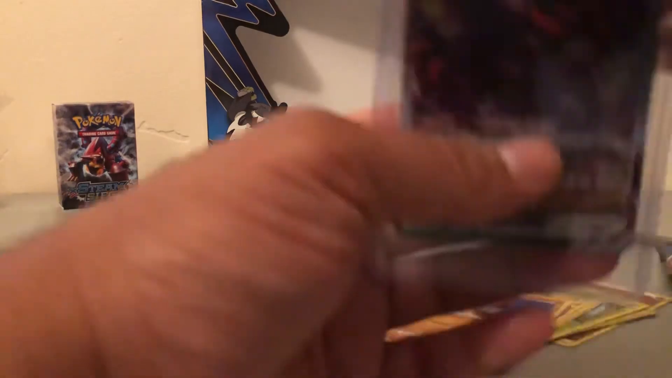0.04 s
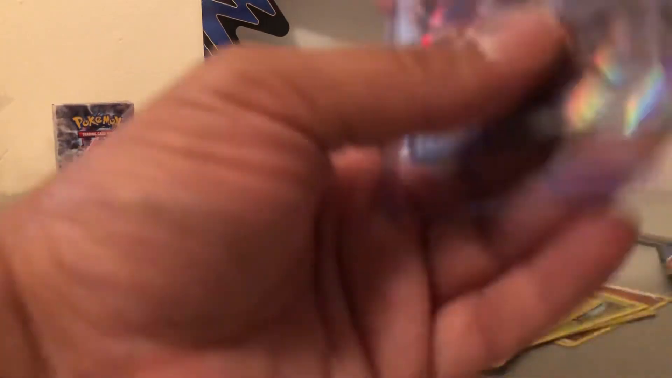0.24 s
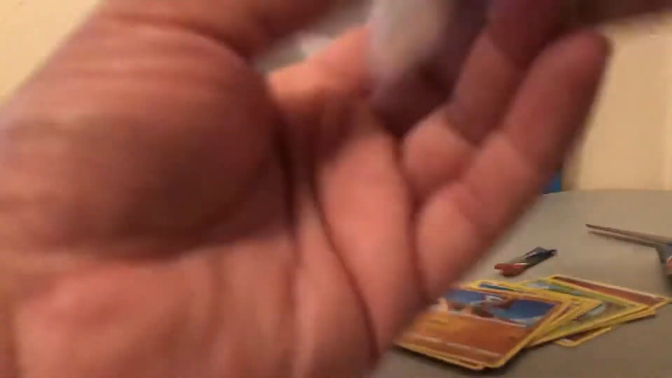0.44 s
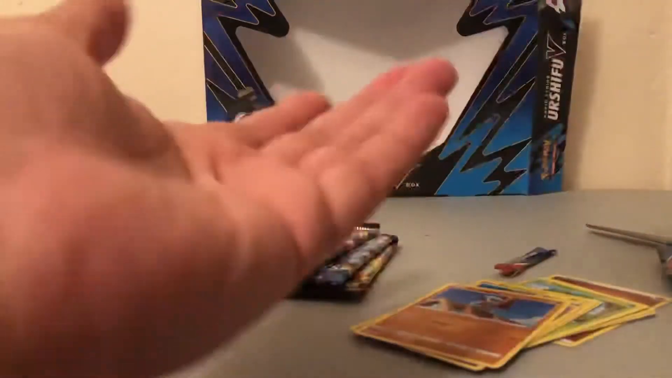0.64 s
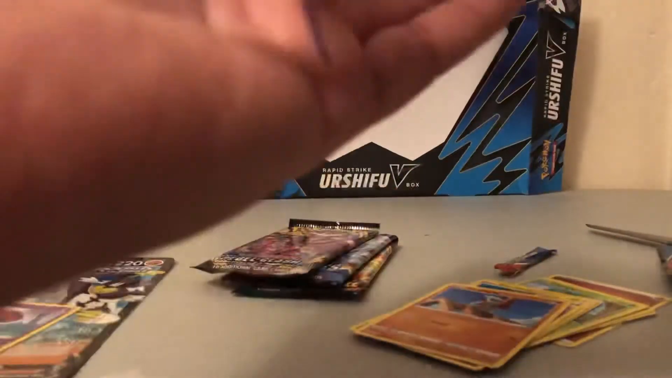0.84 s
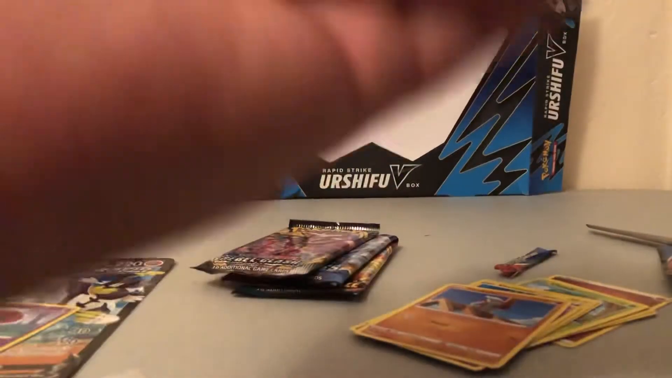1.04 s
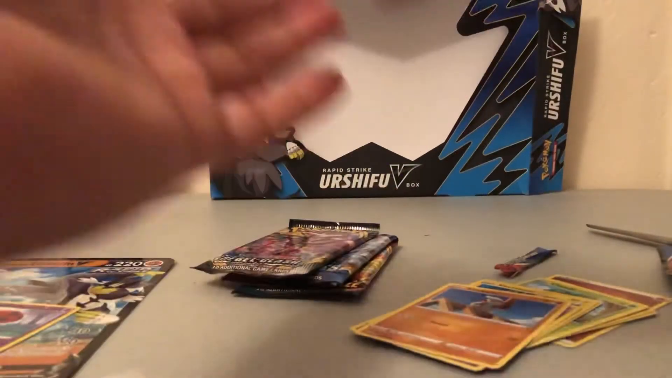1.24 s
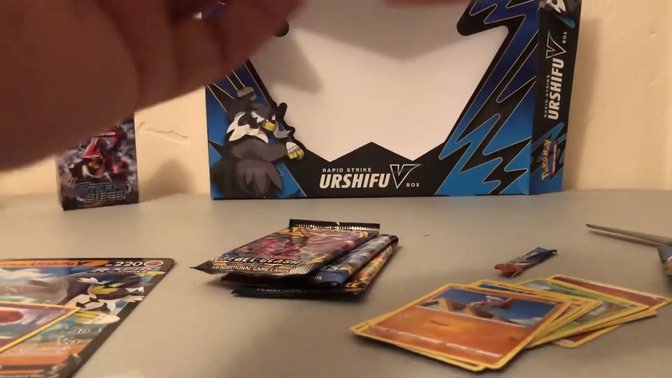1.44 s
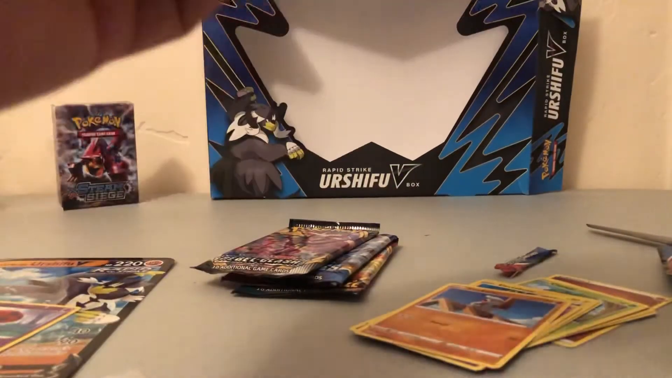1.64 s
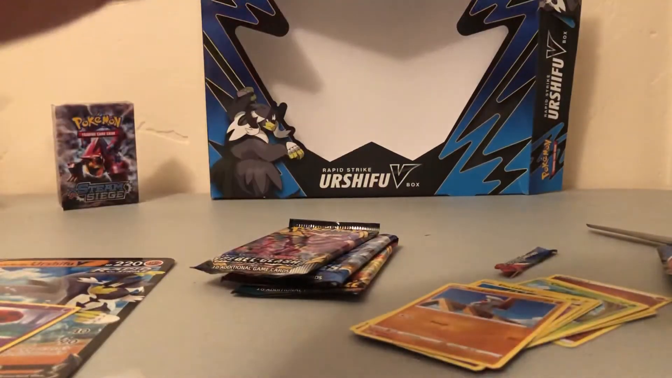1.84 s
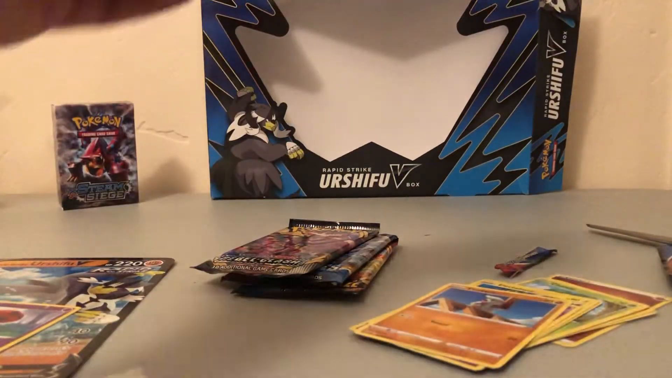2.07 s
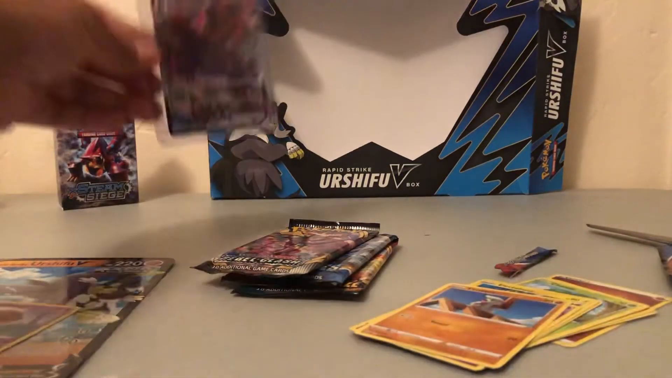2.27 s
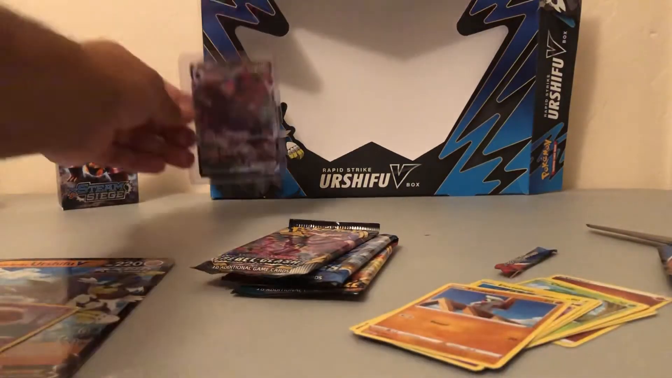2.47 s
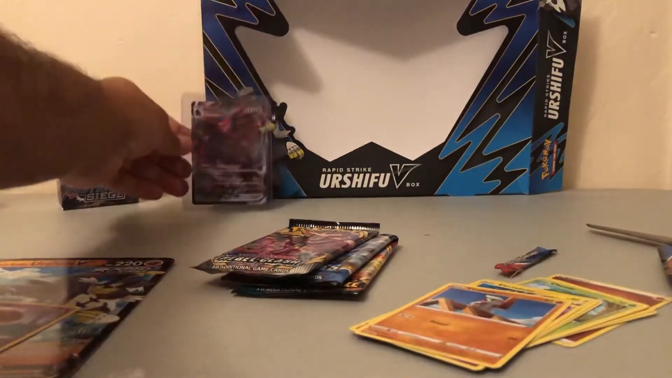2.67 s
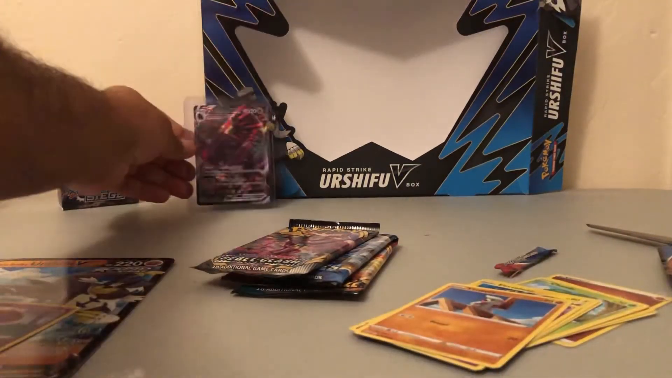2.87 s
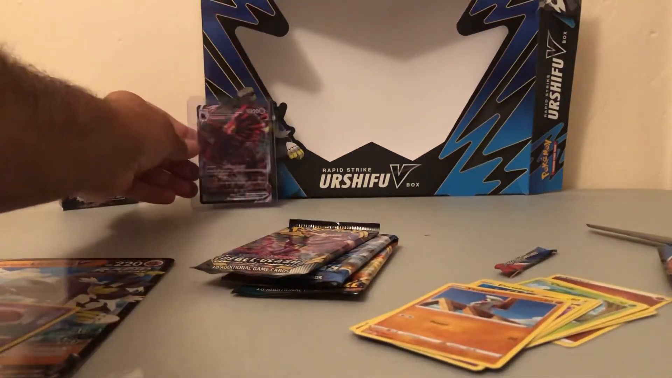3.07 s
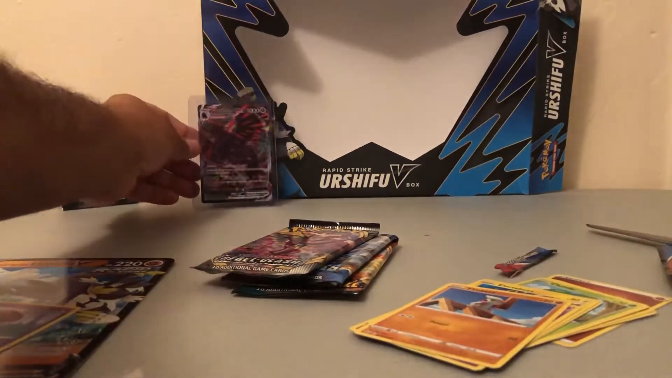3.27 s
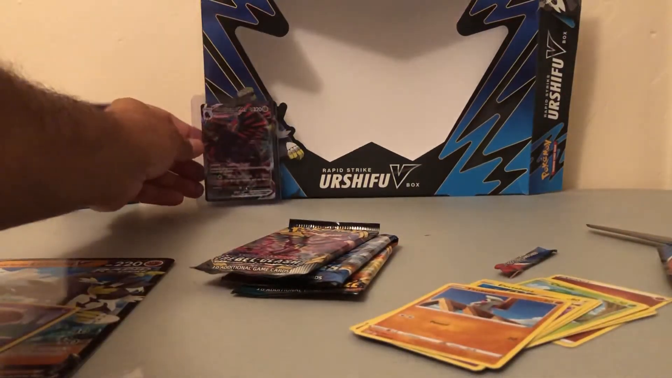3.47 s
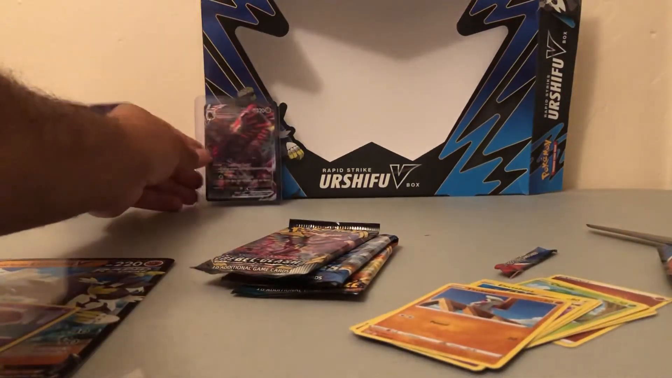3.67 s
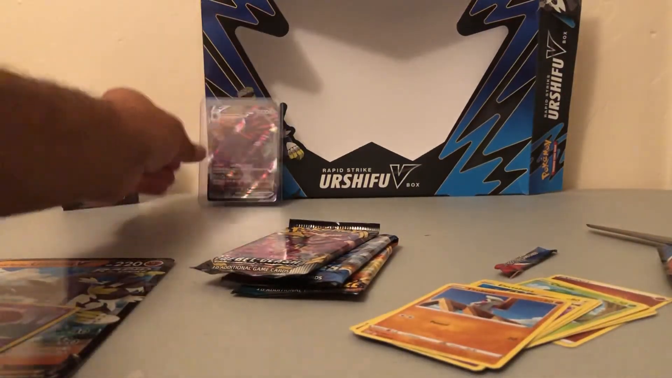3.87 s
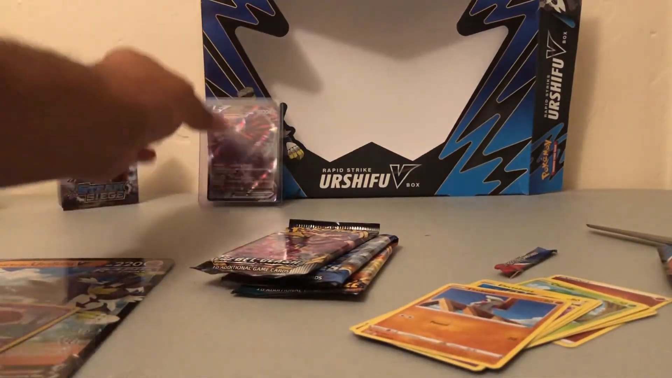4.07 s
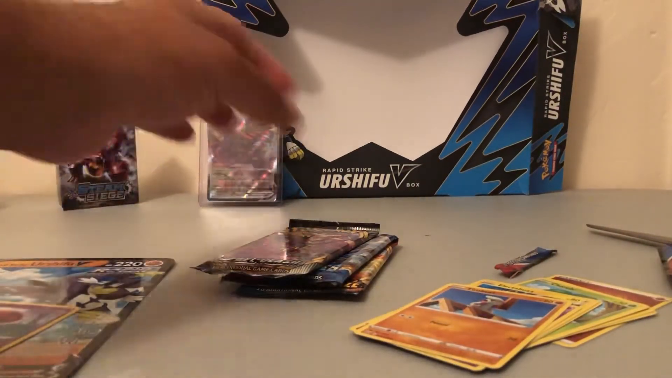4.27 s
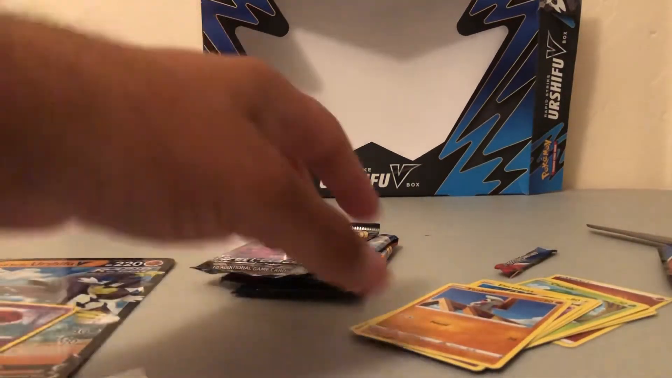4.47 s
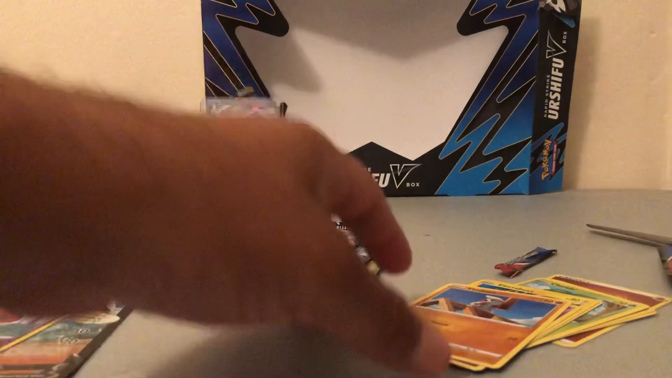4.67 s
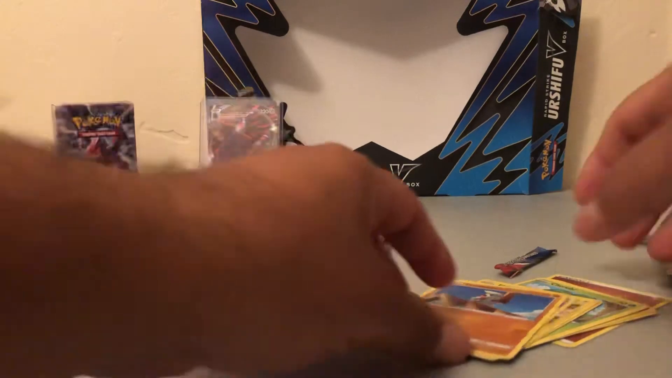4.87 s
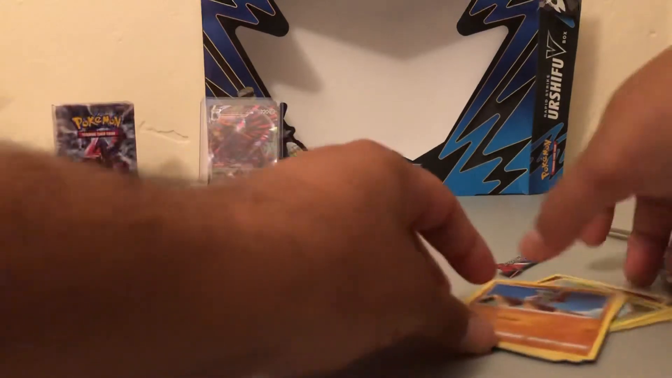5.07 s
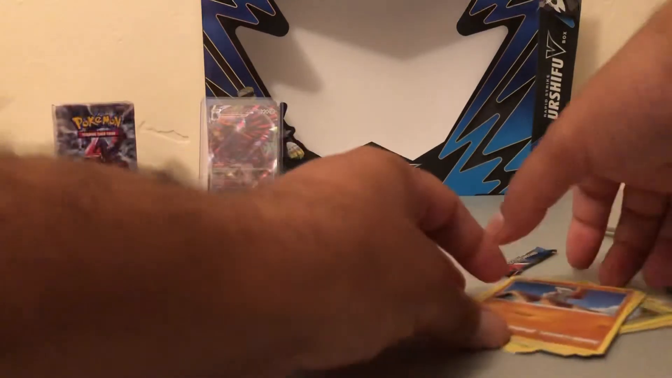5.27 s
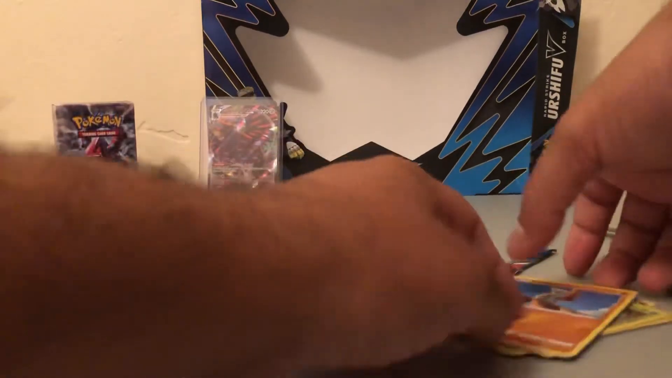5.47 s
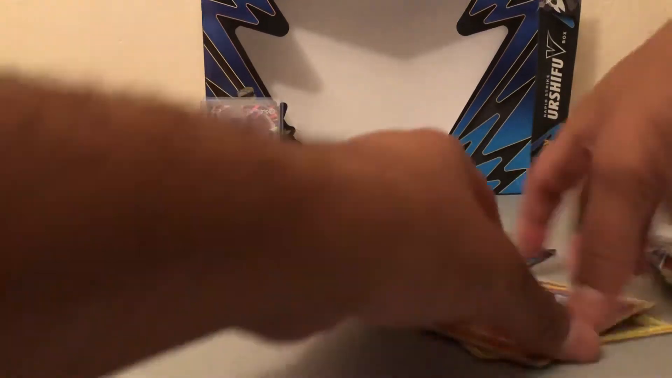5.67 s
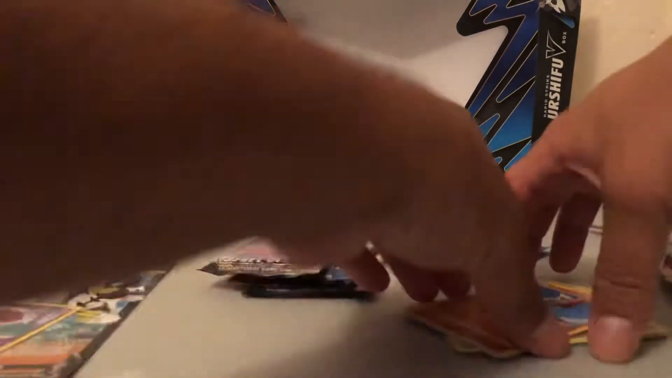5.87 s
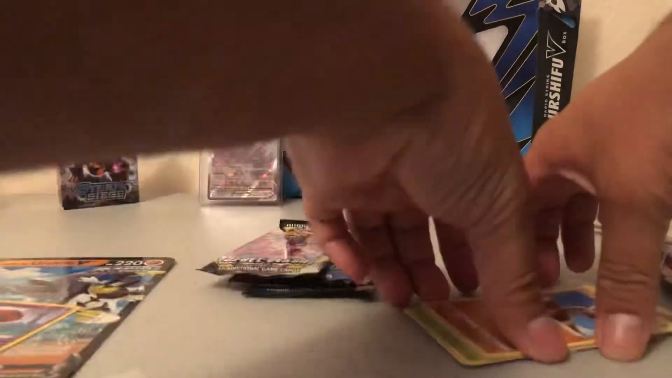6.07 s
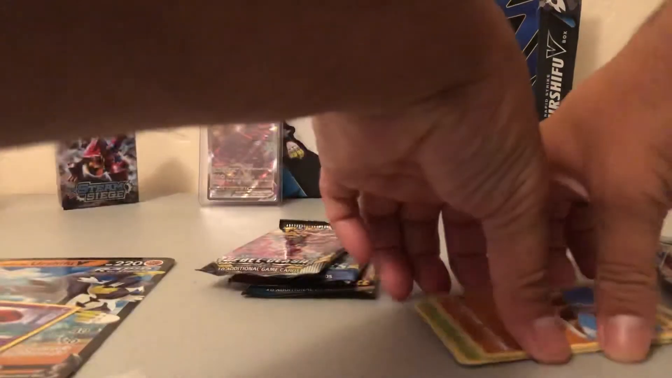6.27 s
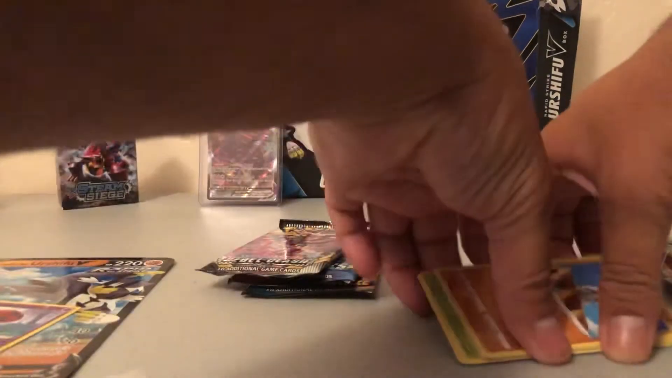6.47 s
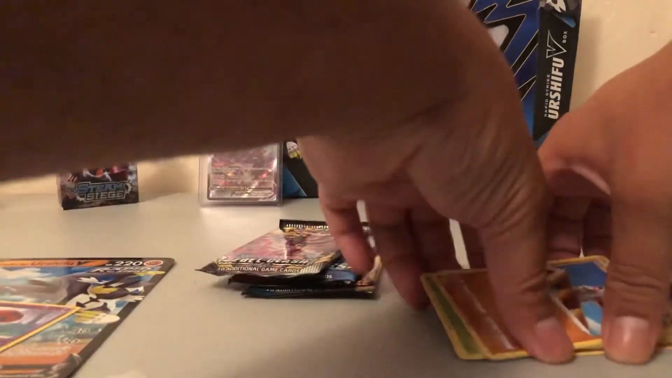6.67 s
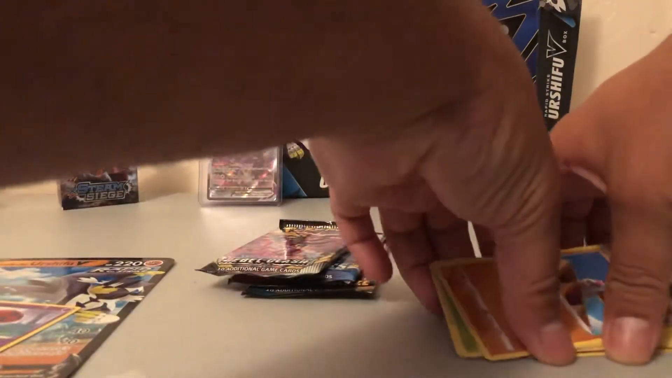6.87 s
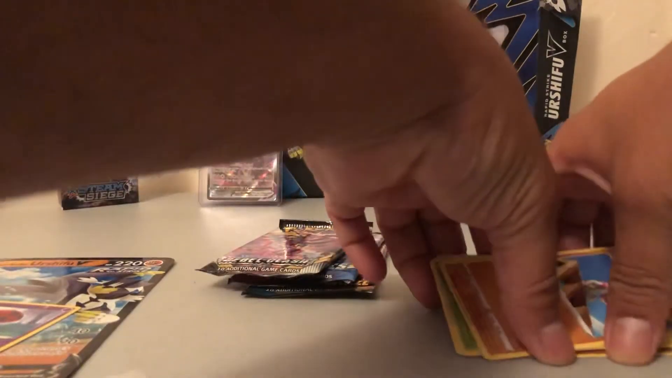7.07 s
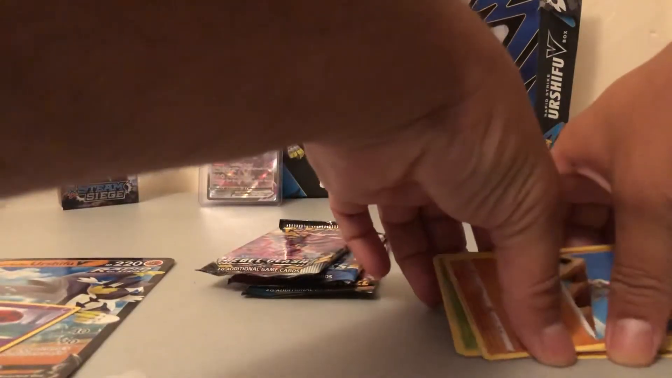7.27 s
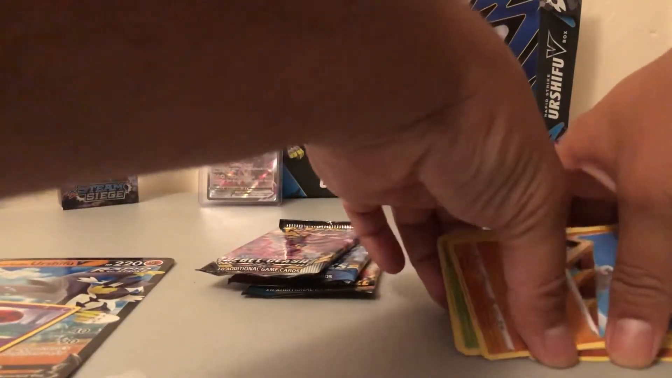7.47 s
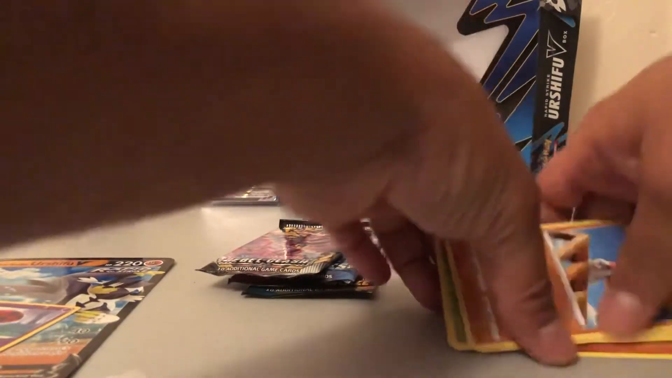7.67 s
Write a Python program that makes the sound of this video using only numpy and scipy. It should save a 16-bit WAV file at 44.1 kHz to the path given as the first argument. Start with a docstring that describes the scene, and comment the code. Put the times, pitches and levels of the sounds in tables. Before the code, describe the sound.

Brief plastic crinkles, a few soft hollow taps on cardboard, then cards sliding and snapping as they are gathered on a tabletop.

```python
"""A table in a quiet room: hands crinkle a plastic sleeve near the microphone, prop the sleeved card
against a cardboard box, then sweep a pile of cards together and square it.
Surfaces grip and slip as they rub; edges catch and let go in single snaps. Both forces shake the low
modes of hand, box or tabletop, ring the sleeve, box or cards, and fizz in the treble."""
import sys
import numpy as np
from scipy import signal
from scipy.io import wavfile
from scipy.ndimage import uniform_filter1d

SR = 44100
rng = np.random.default_rng(int(sys.argv[2]) if len(sys.argv) > 2 else 0)


def pcm_store(signal):
    """Save signal as 16-bit PCM."""
    levels = np.round(np.clip(np.atleast_2d(signal), -1, 1) * 32767)
    wavfile.write(sys.argv[1], SR, levels.astype(np.int16).T)


N = 340893


def gain_of(db):
    """Decibels to amplitude."""
    return 10 ** (np.asarray(db) / 20)


def spectrum_at(points, hz):
    """Table value at hz, interpolated in log frequency."""
    points_hz, values = np.transpose(points)
    return np.interp(np.log(hz + 1), np.log(points_hz + 1), values)


def curves(rows):
    """Columns of a timed table at every sample."""
    times_s, *columns = np.transpose(rows)
    return [np.interp(np.arange(N) / SR, times_s, column) for column in columns]


def unit_energy(x):
    """Impulse response scaled so that white noise keeps its level."""
    return x / np.linalg.norm(x)


def lift_band(x, hz, width_hz, share, range_hz):
    """Lifts a band that follows hz: shift to zero, low-pass, shift back, mix."""
    carrier = np.exp(2j * np.pi * np.cumsum(hz * np.ones(len(x))) / SR)
    pole = np.exp(-np.pi * width_hz / SR)
    band = 2 * (carrier * signal.lfilter([1 - pole], [1, -pole], x / carrier + 1e-18)).real
    return share * band * np.sqrt(range_hz / width_hz) + (1 - share) * x


# Background spectrum: (frequency [Hz], relative density [dB])
FLOOR_SPECTRUM = [(15, -33), (25, -5.5), (60, 7.5), (124, -3.5), (584, -10.5), (952, -16), (2900, -24),
                  (3510, -23.5), (11600, -31), (15200, -30), (16500, -34)]
FLOOR_DB = -66.5


def noise_floor():
    """Room rumble and microphone hiss, with faint drifting patches."""
    frames, hz = N // 512 + 5, np.fft.rfftfreq(2048, 1 / SR)
    real, imag, patches = rng.standard_normal((frames, 1025, 3)).T
    patches = uniform_filter1d(uniform_filter1d(patches, 20, 0), 8, 1)
    level_db = spectrum_at(FLOOR_SPECTRUM, hz)[:, None] + 0.5 * patches / patches.std()
    noise = signal.istft((real + 1j * imag) * gain_of(level_db), nperseg=2048, noverlap=1536)[1][:N]
    return gain_of(FLOOR_DB) * noise / noise.std()


# Room decay: (frequency [Hz], t60 [s])
ROOM_DECAY = [(150, 0.34), (600, 0.15), (2500, 0.1), (10000, 0.11)]


def room_echoes(x):
    """Sparse reflections of random sign, each band dying at its own rate."""
    taps = np.zeros(SR // 2)
    slots = np.arange(300, len(taps) - 20, 20)
    taps[slots + rng.integers(0, 20, len(slots))] = rng.choice([-1., 1.], len(slots))
    hz, t, spectra = signal.stft(taps, SR, nperseg=256)
    decay = gain_of(-60 * t / spectrum_at(ROOM_DECAY, hz)[:, None])
    tail = signal.istft(spectra * decay, SR, nperseg=256)[1]
    return signal.oaconvolve(x, unit_energy(tail))[:N]


def friction(clump_s, clump_db):
    """Noise whose strength jumps as the surfaces grip and slip."""
    grip = uniform_filter1d(rng.standard_normal(N), round(clump_s * SR))
    force = rng.standard_normal(N) * gain_of(clump_db * grip / grip.std())
    return force / force.std()


def patchy(x, depth_db):
    """Random patches of the spectrum swell and fade as the contact area shifts."""
    spectra = signal.stft(x, nperseg=256)[2]
    patches = rng.standard_normal(spectra.shape[::-1]).T
    patches = uniform_filter1d(uniform_filter1d(patches, 7, 0), 14, 1)
    force = signal.istft(spectra * gain_of(depth_db * patches / patches.std()), nperseg=256)[1][:N]
    return force / force.std()


# Swells of low rumble and scrape, the faintest barely above the room noise; rise and fall span 20 dB and are
# clamped to at least MIN_RAMP_S: # (peak time [s], rumble [dB], scrape [dB], rise [s], fall [s], contact pitch
# [Hz])
SWELLS = [(0.0, -54, -62.5, .02, 0.16, 170), (0.138, -59, -62, 0.05, -0.03, 268),
          (0.392, -58.5, -68.5, 0.2, 0.16, 234), (0.66, -60.5, -83.5, 0.3, .25, 220),
          (0.735, -66, -54.5, 0.14, 0.13, 210), (0.774, -44.5, -66, .015, 0.01, 243),
          (0.983, -37, -60, 0, -0.07, 180), (1.014, -51, -61, 0, .07, 109),
          (1.32, -58, -71.5, .2, 1.3, 218), (1.52, -47.5, -59, .06, -0.08, 260),
          (1.555, -51.5, -54, 0.09, -0.03, 160), (1.826, -61, -77, -0.5, -1, 195),
          (2.18, -58.5, -72, .03, .05, 140), (2.27, -62, -71.5, 0.4, 0.2, 232),
          (2.38, -58.5, -68, 0, 0.1, 229), (2.556, -41.5, -67, 0.03, -0.02, 170),
          (2.6, -47, -88, 0.04, 0.04, 135), (2.714, -34.5, -63, 0.0155, .016, 283),
          (2.763, -32, -66, -0.0268, 0.1, 334), (2.83, -46, -54, 0.12, .11, 300),
          (2.95, -47.5, -69, 0.12, .035, 275), (3.015, -38.5, -47.5, .02, 0.15, 300),
          (3.244, -45, -52, -0.02, 0.07, 310), (3.318, -40.5, -76, 0.1, 0.02, 294),
          (3.418, -28, -66, 0.0152, 0.02, 360), (3.47, -45, -54.5, -0.36, 0.05, 360),
          (3.535, -42, -61, 0.04, 0, 244), (3.583, -40, -64, -0.05, 0.18, 249),
          (3.693, -59, -77, -0.66, .06, 220), (3.75, -41, -58.5, -0.54, 0.05, 280),
          (3.822, -36.5, -58, 0.22, 0.03, 248), (4.218, -53.5, -71, .065, -0.13, 174),
          (4.696, -34, -62, .014, 0.27, 192), (4.72, -57, -51, 0.02, 0.28, 220),
          (5.006, -37, -52, 0.13, 0.2, 194), (5.078, -33.5, -56, 0.05, 0.15, 264),
          (5.193, -30, -56, 0.06, 0.02, 300), (5.27, -45.5, -59, 0.18, .11, 210),
          (5.433, -41.5, -64, 0.14, 0.08, 109), (5.46, -47, -56, -0.06, 0.13, 200),
          (5.51, -55, -60.5, -0.27, 0.07, 190), (5.711, -31, -63, -0.0661, 0.1, 238),
          (5.861, -36.5, -64, 0, 0.2, 226), (6.035, -36.5, -60, 0.19, -0.12, 227),
          (6.13, -33.5, -53.5, 0.07, 0.21, 278), (6.18, -48, -51, 0.08, 0.04, 210),
          (6.347, -37, -62.5, -0.2, 0.25, 224), (6.411, -33, -44, 0.06, 0.05, 230),
          (6.544, -33, -55, -0.1, 0.26, 270), (6.606, -31, -63, .09, 0.08, 270),
          (6.804, -34, -68, 0, 0.28, 229), (6.876, -44.5, -69, -0.5, 0.18, 288),
          (7.004, -42, -55, -1.07, -0.3, 240), (7.104, -39, -71, 0.2, 0.05, 215),
          (7.218, -30, -62, 0.04, 0.08, 340), (7.421, -34, -54, -0.74, 0.1, 175),
          (7.469, -30.5, -49, -0.01, 0.02, 250), (7.63, -54.5, -50.5, 0.22, 0.1, 203),
          (7.73, -44.5, -49, 0.2, .05, 300)]
MIN_RAMP_S, REST_HZ, REST_DB = 0.002, 200, -75


def rumble_swells():
    """Swells of rumble and scrape: their envelopes, and a power-weighted pitch."""
    t = np.arange(0, N, 64) / SR
    peak_s, rumble_db, scrape_db, rise_s, fall_s, hz = np.transpose(SWELLS)[:, :, None]
    before = (peak_s - t) / np.maximum(rise_s, MIN_RAMP_S)
    after = (t - peak_s) / np.maximum(fall_s, MIN_RAMP_S)
    shape_db = -20 * np.maximum(before, after)
    rumble_power = gain_of(rumble_db + shape_db) ** 2
    scrape_power = gain_of(scrape_db + shape_db) ** 2
    rest_power = gain_of(REST_DB) ** 2
    pitch_hz = ((rumble_power * hz).sum(0) + rest_power * REST_HZ) / (rumble_power.sum(0) + rest_power)
    rumble, scrape = np.sqrt(rumble_power.sum(0)), np.sqrt(scrape_power.sum(0))
    return curves(np.column_stack([t, rumble, scrape, pitch_hz]))


# Single swishes: (start [s], length [s], fizz [dB], scrape [dB], brightness [0-1])
SWISHES = [(0.044, 0.007, -74, -68, 0.2), (0.378, 0.024, -78, -78, 0.5), (0.403, 0.042, -61, -66, 0.4),
           (0.778, 0.012, -43, -43, 0.16), (0.809, 0.034, -59, -56, 0.3), (0.991, 0.014, -47.5, -54, 0.2),
           (1.35, 0.095, -64.5, -75, 0.3), (1.536, 0.023, -76, -55, 0.5), (1.765, 0.14, -79.5, -88, 0.5),
           (2.538, 0.087, -76, -77, 1), (2.761, 0.022, -88, -51, 0.19), (3, 0.039, -86, -49.5, 0.0),
           (3.312, 0.015, -76, -43.5, 0.1), (3.414, 0.049, -74, -53, 0.0), (4.195, 0.059, -66, -63, 0.8),
           (4.687, 0.033, -54, -47, 0.6), (4.905, 0.033, -64.5, -94, 0.8), (4.993, 0.023, -60.5, -57, 0.16),
           (5.047, 0.041, -64.5, -54, 0.0), (5.182, 0.052, -55.5, -55.5, 0.3),
           (5.38, 0.033, -68.5, -60, 0.3), (5.449, 0.015, -68, -55, 0.16), (5.512, 0.052, -61, -65, 0.6),
           (5.618, 0.01, -77, -70, 0.8), (5.711, 0.069, -61, -57, 0.8), (5.845, 0.043, -68.5, -49.5, 0.9),
           (5.932, 0.081, -71, -66, 0.8), (6.033, 0.03, -63, -55, 0.7), (6.122, 0.064, -76, -72, 1),
           (6.175, 0.014, -94.5, -77, 0.1), (6.238, 0.0093, -89, -51, 0.3),
           (6.406, 0.029, -54.5, -54, 0.75), (6.455, 0.036, -60, -53, 1), (6.577, 0.081, -55.5, -46, 0.43),
           (6.775, 0.034, -66, -50, 0.5), (6.828, 0.047, -65.5, -60, 0.2), (6.92, 0.029, -57, -51, 1),
           (6.994, 0.063, -73, -55, 0.7), (7.083, 0.0091, -64, -44, 0.4), (7.12, 0.012, -61, -57, 1),
           (7.196, 0.025, -59, -49.5, 0.4), (7.333, 0.0078, -63, -59.5, 0.4),
           (7.455, 0.023, -68, -42.5, 0.0), (7.541, 0.0044, -34.5, -37.5, 0.3)]


def swishes():
    """A card or sleeve slides briefly: envelopes of scrape, dull fizz and bright fizz."""
    t, envelopes = np.arange(N) / SR, np.zeros((3, N))
    for start_s, length_s, fizz_db, scrape_db, brightness in SWISHES:
        end_s, fizz = start_s + length_s, gain_of(fizz_db)
        span = slice(max(round((start_s - 0.03) * SR), 0), round((end_s + 0.06) * SR))
        attack = 1 / (1 + np.exp((start_s - t[span]) / 0.003))
        release = 1 / (1 + np.exp((t[span] - end_s) / 0.004))
        gains = [gain_of(scrape_db), fizz * (1 - brightness), fizz * brightness]
        envelopes[:, span] += np.outer(gains, attack * release)
    return envelopes


# Course of the rasp: (time [s], pitch [Hz])
RASP_PITCH = [(0, 1970), (2.3, 1680), (2.9, 1340), (3.02, 1650), (3.15, 1430), (3.32, 1800), (3.8, 1400),
              (4.7, 1580), (5.0, 1460), (5.3, 1810), (5.6, 1870), (5.8, 2080), (6.2, 1770), (6.4, 2020),
              (7.73, 1870)]
WANDER_SHARE, WANDER_S = 0.041, 0.065


def rasp():
    """Scraping noise whose pitch strays as the edge finds new fibres."""
    noise = patchy(friction(clump_s=0.006, clump_db=2.04), depth_db=2.4)
    stray = uniform_filter1d(rng.standard_normal(N), round(WANDER_S * SR))
    pitch_hz = curves(RASP_PITCH)[0] * (1 + WANDER_SHARE * stray / stray.std())
    return lift_band(noise, pitch_hz, width_hz=420, share=0.54, range_hz=2000)


# Steady sliding under the swells: (time [s], rumble [dB], scrape [dB], fizz [dB])
SLIDING = [(0, -72, -78, -68), (.2, -74, -78, -80.5), (.75, -75, -79, -78.5), (1.45, -72, -73, -82.5),
           (1.48, -74, -75, -70), (1.63, -81, -71, -66.5), (1.66, -72, -87, -82.5), (2.1, -72, -81, -83.5),
           (2.68, -74, -84.5, -80.5), (3.1, -51, -68, -87), (3.3, -57.5, -82.5, -81), (3.9, -70, -88, -85),
           (4.66, -73, -86, -87.5), (4.73, -52, -52, -55), (4.9, -48, -62.5, -68.5),
           (5.13, -61, -54.5, -66), (5.36, -66, -78, -74), (5.68, -59, -70, -75), (5.93, -50, -57, -63),
           (6.08, -41, -58, -73), (6.2, -61, -58, -64.5), (6.3, -48, -63.5, -75), (6.53, -57, -69, -70),
           (6.67, -53.5, -58.5, -72), (7.0, -54, -61.5, -74), (7.16, -73, -71.5, -76),
           (7.33, -47, -56, -72), (7.55, -49, -55.5, -63), (7.73, -62, -57, -54)]


def rub_forces():
    """Rumble, scrape and fizz forces of surfaces in sliding contact."""
    swell_rumble, swell_scrape, contact_hz = rumble_swells()
    slide_rumble, slide_scrape, slide_fizz = gain_of(curves(SLIDING))
    swish_scrape, swish_dull, swish_bright = swishes()
    fizz = patchy(friction(clump_s=0.008, clump_db=1.5), depth_db=3)
    dull = (swish_dull + slide_fizz / 2) * 2 * uniform_filter1d(fizz, size=3)
    bright = (swish_bright + slide_fizz / 2) * (fizz - np.roll(fizz, 1))
    drag = friction(clump_s=0.013, clump_db=1.87)
    drag = lift_band(drag, contact_hz, width_hz=120, share=0.71, range_hz=140)
    rumble = np.hypot(swell_rumble, slide_rumble) * drag
    scrape = (swish_scrape + np.hypot(swell_scrape, slide_scrape)) * rasp()
    return np.array([rumble, scrape, dull + bright])


# Edge snaps: (time [s], click [dB], fizz [dB], thump [dB], pitch [Hz], t60 [s])
SNAPS = [(0.2237, -42, -42.5, -61.5, 1270, 0.013), (0.3336, -45.5, -76, -72, 1220, 0.011),
         (0.7713, -32, -32.5, -53.5, 1630, 0.047), (0.9821, -32, -35, -52, 2320, 0.023),
         (0.9884, -44, -35.5, -56.5, 2700, 0.081), (1.037, -46, -44, -75, 4410, 0.013),
         (1.059, -46, -57, -68, 2200, 0.049), (1.473, -50, -47, -76, 3120, 0.015),
         (1.491, -44.5, -33, -69, 3310, 0.0064), (1.503, -51, -33, -57, 4220, 0.017),
         (1.5088, -35, -32, -55, 2210, 0.011), (1.536, -34.5, -27, -53.5, 3430, 0.011),
         (1.5505, -37, -46, -59, 1580, 0.014), (1.8212, -48.5, -43.5, -62, 1300, 0.012),
         (2.399, -55.5, -59, -66, 1290, 0.045), (2.547, -59, -71, -54.5, 2150, 0.098),
         (2.6996, -34.5, -56, -43, 1400, 0.048), (2.7621, -26.5, -45.5, -38.5, 1700, 0.022),
         (2.832, -45, -73, -46.5, 1330, 0.012), (2.9269, -51.5, -81, -48, 1290, 0.013),
         (2.9451, -44.5, -77, -53, 1340, 0.016), (2.9954, -40.5, -75, -51.5, 1700, 0.081),
         (3.0115, -35, -67, -53, 1800, 0.0087), (3.0287, -52, -40, -47, 1810, 0.014),
         (3.217, -45, -72, -53.5, 1620, 0.16), (3.3121, -37, -68, -44.5, 2000, 0.048),
         (3.4103, -20.5, -44.5, -30.5, 1840, 0.022), (3.507, -42.5, -72, -64, 1390, 0.016),
         (3.5641, -36.5, -77, -40, 1600, 0.015), (3.7403, -44.5, -74, -44.5, 1700, 0.014),
         (3.8006, -38, -71, -42.5, 1340, 0.01), (3.845, -43.5, -52.5, -65, 1200, 0.015),
         (4.2048, -46.5, -53.5, -55, 1860, 0.15), (4.282, -42, -78, -71, 1310, 0.011),
         (4.6646, -50, -53, -78, 3150, 0.014), (4.681, -39, -32, -64, 1660, 0.01),
         (4.7024, -19, -13, -42, 3600, 0.005), (4.71, -38, -46, -65, 1670, 0.0077),
         (4.8389, -41, -40, -52.5, 2840, 0.014), (4.8394, -46, -42, -52.5, 1770, 0.017),
         (4.967, -44, -53, -49, 2160, 0.021), (4.9863, -39, -65, -74, 1200, 0.014),
         (4.9957, -29, -49, -41, 1190, 0.015), (5.0557, -37, -63, -40.5, 1190, 0.21),
         (5.0666, -30, -51, -37.5, 1860, 0.016), (5.1425, -49, -53, -63, 1640, 0.013),
         (5.1817, -39, -61, -40.5, 1780, 0.21), (5.418, -40, -49, -47, 1500, 0.015),
         (5.45, -36.5, -51.5, -56, 1260, 0.027), (5.6253, -62, -47.5, -81, 2270, 0.017),
         (5.7111, -30.5, -43.5, -40, 1970, 0.1), (5.834, -38, -77, -49, 2240, 0.013),
         (5.8509, -36, -65, -42, 2260, 0.079), (5.9258, -53, -64, -52, 2220, 0.013),
         (6.0756, -22.5, -40, -34.5, 2380, 0.02), (6.1351, -34, -35, -37.5, 1870, 0.012),
         (6.2377, -28.5, -38.5, -45, 2070, 0.019), (6.338, -44.5, -56, -41, 2390, 0.26),
         (6.3869, -37, -47, -39, 2080, 0.044), (6.4135, -39, -30.5, -51, 2200, 0.012),
         (6.4847, -35.5, -37.5, -58, 2000, 0.017), (6.5427, -28, -43, -41, 2160, 0.01),
         (6.558, -23, -37, -60.5, 2050, 0.025), (6.6033, -41, -33, -38, 2200, 0.013),
         (6.758, -40.5, -54, -48.5, 3340, 0.015), (6.7836, -51, -52, -39.5, 2040, 0.011),
         (6.8022, -26, -52, -35, 2220, 0.019), (6.8844, -28, -45.5, -66, 2100, 0.018),
         (6.9176, -18, -24, -64, 2030, 0.0092), (6.98, -39, -57, -52, 2120, 0.014),
         (7.0172, -21, -30.5, -36.5, 2140, 0.012), (7.0542, -33, -48, -45, 1950, 0.016),
         (7.0861, -28, -46, -39.5, 1220, 0.018), (7.0958, -52.5, -65, -40.5, 1500, 0.015),
         (7.1039, -32, -63, -56, 2070, 0.013), (7.1184, -40, -41.5, -59, 2200, 0.028),
         (7.198, -37, -69, -39, 2300, 0.11), (7.2165, -43, -64, -38.5, 1500, 0.02),
         (7.3105, -15.5, -20.5, -46.5, 1920, 0.021), (7.3461, -29.5, -44, -40.5, 2040, 0.039),
         (7.3739, -26, -33.5, -44, 2080, 0.012), (7.4524, -55, -66, -40, 2130, 0.09),
         (7.469, -30, -44, -60, 2160, 0.016), (7.5331, -23.5, -47, -67, 2000, 0.012),
         (7.5368, -3, -20, -56, 1820, 0.012), (7.5397, -6, -30, -48.5, 2980, 0.011),
         (7.7079, -26.5, -67, -53.5, 1140, 0.014)]
SNAP_SAMPLES, THUMP_SAMPLES, SNAP_ATTACK_S = 6000, 90, 0.00037


def snap_forces():
    """An edge catches and lets go: a soft thump, a pitched dying rattle and a spit of treble."""
    forces, t = np.zeros((3, N + SNAP_SAMPLES)), np.arange(SNAP_SAMPLES) / SR
    thumps, clicks, fizz = forces
    rattles = rng.standard_normal((len(SNAPS), 2, len(t)))
    rattles[:, :, 16] = 5.0  # one hard crack at release
    for (time_s, click_db, fizz_db, thump_db, hz, t60_s), rattle in zip(SNAPS, rattles):
        at = round(time_s * SR)
        envelope = gain_of(-60 * t / t60_s) * (1 - np.exp(-t / SNAP_ATTACK_S))
        click, spit = gain_of([[click_db], [fizz_db]]) * envelope * rattle / 2  # peaks near 2 x rms
        click = signal.lfilter(*signal.butter(1, 0.54 * hz, "high", fs=SR), click)
        thumps[at:at + THUMP_SAMPLES] += gain_of(thump_db) * np.hanning(THUMP_SAMPLES)
        clicks[at:at + len(t)] += lift_band(click, hz, width_hz=370, share=0.52, range_hz=2600)
        fizz[at:at + len(t)] += spit
    return forces[:, :N]


def modal_response(modes):
    """Impulse response of damped modes of alternating sign."""
    t = np.arange(8192) / SR
    rings = [(-1) ** k * gain_of(db) * width_hz * np.exp(-np.pi * width_hz * t)
             * np.sin(2 * np.pi * hz * t) for k, (hz, width_hz, db) in enumerate(modes)]
    return unit_energy(sum(rings))


def fizz_response(points):
    """Minimum-phase impulse response with the given spectrum."""
    hz = abs(np.fft.fftfreq(4096, 1 / SR))
    log_gain = np.log(gain_of(spectrum_at(points, hz)))
    spectrum = np.exp(np.conj(signal.hilbert(log_gain)))
    return unit_energy(np.fft.ifft(spectrum).real[:2048])


# Low modes, shaken by rumble and thumps: (frequency [Hz], width [Hz], level [dB])
HAND_MODES = [(56, 25, 0.5), (82, 68, 3), (128, 47, 1.5), (187, 110, -4.5), (218.3, 38, -2), (297, 95, -7),
              (396, 130, -6.5), (616, 147, -8.5)]
HOLLOW_BOX_MODES = [(125.3, 9, -7), (191.2, 22, -2.5), (268.5, 18, 0.5), (337.6, 17, -3),
                    (419.5, 27.5, 0.5), (475, 25, -4), (538, 54, -8.5), (607, 69, -8), (780, 62, -10.5)]
TABLETOP_MODES = [(65, 22, -9.5), (100.2, 29.5, -1), (126.5, 38, 0.5), (181, 43.5, -2), (275.4, 21.5, 0),
                  (313, 90, -8.5), (405, 26, -2.5), (457.2, 17.2, -2.5), (528, 71, -4.5), (630, 44, -5.5),
                  (786, 113, -9)]
# Upper modes, rung by scrapes and clicks: (frequency [Hz], width [Hz], level [dB])
SLEEVE_MODES = [(980, 810, 6.5), (1970, 1450, 2.5), (3190, 1310, 8.5), (4400, 2960, 1.5)]
BOX_MODES = [(1062, 230, -0.5), (1332, 87, -0.5), (1735, 310, -4.5), (2240, 194, -3), (2660, 450, -7.5),
             (3440, 330, -10), (4800, 1100, -19.5)]
PILE_MODES = [(877, 244, -2.5), (1303, 300, -4), (1770, 183, -4), (2220, 286, -2.5), (3114, 340, -5),
              (3370, 264, -4), (4025, 560, -7)]
# Fizz spectrum, one list per stage: (frequency [Hz], relative density [dB])
FIZZ_SPECTRA = [
    [(2350, -51), (4000, -5), (4670, -3), (6380, 3), (9750, -1), (14400, 1), (16100, -1.5), (16700, -40)],
    [(2350, -36), (4000, -4.5), (5200, -13), (6770, -12), (8200, -18), (14500, -23.5), (16000, -50),
     (16700, -61)],
    [(2350, -15), (4000, -6.5), (4870, -7.5), (6450, -5.5), (7100, -9), (7770, -8.5), (9460, -10.5),
     (15100, -10.5), (16100, -15), (16700, -74)],
]
# Sleeve, box and pile stages: (start [s], end [s])
STAGES_S = [(0, 2.33), (2.33, 4.1), (4.1, 7.73)]


def handling():
    """Snaps and rubbing drive the objects handled in each stage."""
    out, forces = np.zeros(N), snap_forces() + rub_forces()
    bodies = [(HAND_MODES, SLEEVE_MODES), (HOLLOW_BOX_MODES, BOX_MODES), (TABLETOP_MODES, PILE_MODES)]
    for span_s, (low, upper), fizz in zip(STAGES_S, bodies, FIZZ_SPECTRA):
        start, end = (round(s * SR) for s in span_s)
        responses = modal_response(low), modal_response(upper), fizz_response(fizz)
        for force, response in zip(forces[:, start:end], responses):
            sound = signal.oaconvolve(force, response)[:N - start]
            out[start:start + len(sound)] += sound
    return out


def scene():
    """Close handling, faint room echoes and the noise floor, in mono."""
    direct = handling()
    return (direct + gain_of(-15.5) * room_echoes(direct) + noise_floor())[None]


LOW_CUT_HZ, HIGH_CUT_HZ = 42, 16620


def record(dry):
    """Microphone bass roll-off, then a steep band limit."""
    thinned = signal.sosfilt(signal.butter(3, LOW_CUT_HZ, "high", fs=SR, output="sos"), dry)
    lowpass = signal.firwin(511, HIGH_CUT_HZ, window=("kaiser", 9), fs=SR)
    return signal.oaconvolve(thinned, lowpass[None], "same")


dry = scene()
out = record(dry)
pcm_store(out)
```